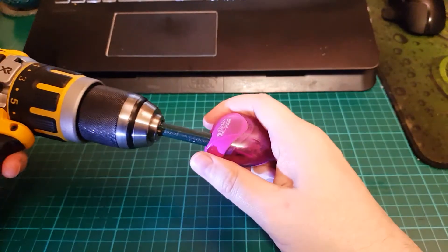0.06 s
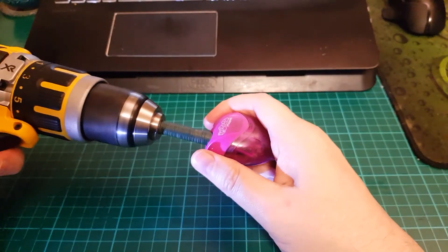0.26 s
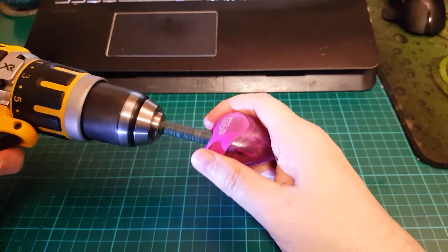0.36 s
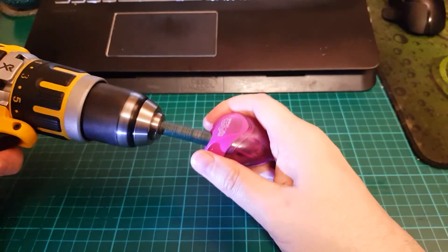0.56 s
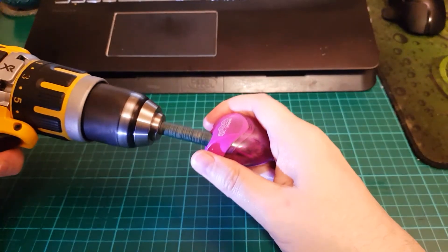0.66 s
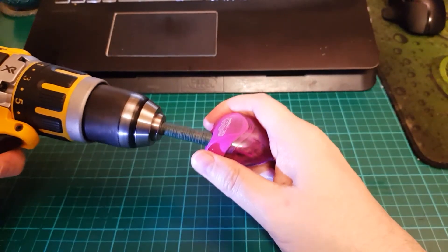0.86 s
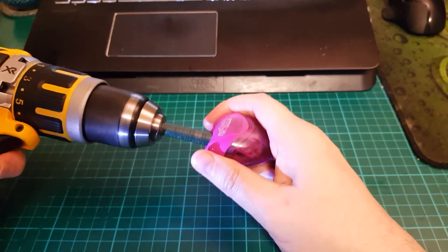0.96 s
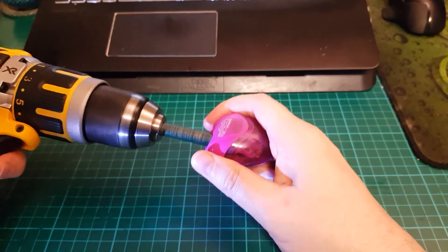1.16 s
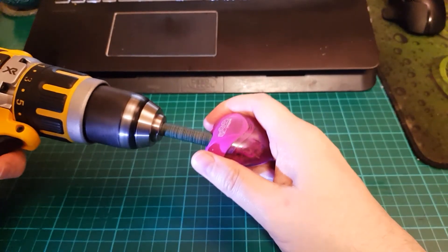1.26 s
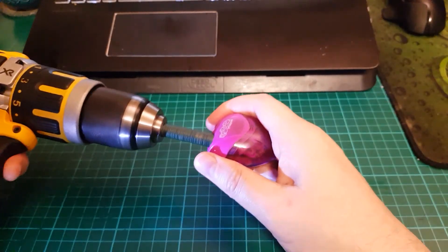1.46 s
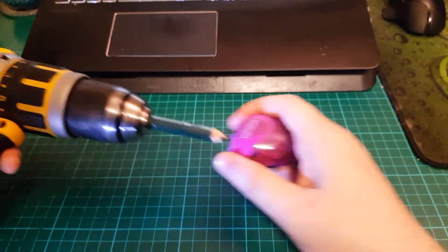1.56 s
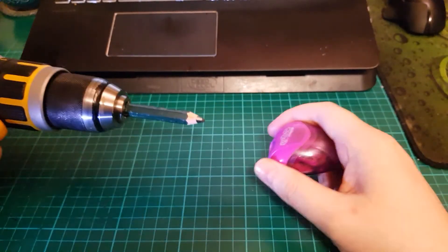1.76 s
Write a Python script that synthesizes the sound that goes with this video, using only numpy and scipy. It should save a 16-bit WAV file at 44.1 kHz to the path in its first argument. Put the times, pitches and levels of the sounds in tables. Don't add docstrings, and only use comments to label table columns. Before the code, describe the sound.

A cordless drill, close up in a quiet small room. Faint hum and hiss, then trigger creaks and clicks at 0.12-0.24 seconds. The motor leaps to speed by about 0.35 and holds a nearly steady high whine within a dense, bright, fluttering rush of fan and sharpener blade. At 1.47 it brakes, pitch falling fast, with a tick near 1.54, soft desk thumps and a faint pencil slide until 1.76.

```python
import sys
import numpy as np
from scipy import signal
from scipy.io import wavfile
from scipy.ndimage import uniform_filter1d

SR = 44100
rng = np.random.default_rng(int(sys.argv[2]) if len(sys.argv) > 2 else 0)


def field_ratio(decibels):
    return 10 ** (np.asarray(decibels, dtype=float) / 20)


def unload_wav(signal):
    wavfile.write(
        sys.argv[1],
        SR,
        np.round(np.clip(np.atleast_2d(signal).T, -1, 1) * 32767).astype(np.int16),
    )


N = 79380
FULL_HZ = 6308
BRAKE_S = 1.472


def evened(x):
    return x / np.sqrt(np.mean(x ** 2) + 1e-20)


def read(points, hz):
    f, value = np.transpose(points)
    return np.interp(np.log(hz + 1), np.log(f + 1), value)


def follow(points, t):
    return np.interp(t, *np.transpose(points))


def drift(rate_hz):
    t = np.arange(0, N + 64, 64)[:, None] / SR
    f = np.geomspace(rate_hz / 8, rate_hz, 12) * rng.uniform(.9, 1.1, 12)
    wander = evened(np.sin(2 * np.pi * (f * t + rng.random(12))).sum(1))
    return np.interp(np.arange(N), np.arange(len(t)) * 64, wander)


# frequency in Hz, level in dB.
RUSH_COLOUR = [(40, -12), (200, -20), (500, -9.5), (700, -12.5), (1100, -3.5), (5000, -1.5), (9000, -1.5),
               (16000, -2)]
# frequency in Hz, width in Hz, level in dB.
LEFT_PORT = [(1686, 800, 1.5), (2400, 290, 6.5), (2994, 106, 7.5), (3750, 1230, 2.5), (6500, 1000, 3.5),
             (7260, 880, 6), (12650, 1760, 8), (12280, 1600, 5), (15300, 810, -7.5)]
# frequency in Hz, width in Hz, level in dB.
RIGHT_PORT = [(1710, 500, -9), (2220, 930, -0.5), (3480, 2300, 1.5), (4400, 640, -2.5), (6200, 1200, -18),
              (7100, 300, -7), (8640, 180, 12.5), (12000, 1500, -13), (15300, 700, -15)]
# frequency in Hz, width in Hz, depth in dB.
DESK_DIPS = [(2150, 180, -8.5), (2870, 110, 0), (4880, 170, -9), (8680, 320, -11)]


def colour(hz):
    def bump(f, width):
        return 1 / (1 + (2 * (hz - f) / width) ** 2)

    dips = field_ratio(sum(db * bump(f, width) for f, width, db in DESK_DIPS))
    gains = []
    for port in (LEFT_PORT, RIGHT_PORT):
        rings = sum(field_ratio(2 * db) * bump(f, width) ** 2 for f, width, db in port)
        gains.append(dips * np.sqrt(field_ratio(2 * read(RUSH_COLOUR, hz)) + rings))
    return np.array(gains)


# frequency in Hz, likeness from 0 to 1.
LIKENESS = [(60, 0.87), (400, 0.97), (800, 0.6), (1700, .35), (2500, 0.55), (4000, .4), (6000, 0.25),
            (12000, 0.2), (15200, .35)]


def pair(gains, drive, patchy_db):
    left_lag_s = -0.00016
    hz, _, z = signal.stft(drive, SR, nperseg=512, noverlap=384)
    patches = uniform_filter1d(rng.standard_normal(z.shape[1:]), 6, 0)
    patches = evened(uniform_filter1d(patches, 20, 1))
    same = np.clip(read(LIKENESS, hz), 0, 1)[:, None]
    left = z[0] * np.exp(-2j * np.pi * hz * left_lag_s)[:, None]
    right = same * z[0] + np.sqrt(1 - same ** 2) * z[1]
    z = np.array([left, right]) * gains(hz)[..., None] * field_ratio(patchy_db * patches)
    return evened(signal.istft(z, SR, nperseg=512, noverlap=384)[1][:, :N])


# frequency in Hz, level in dB per Hz.
HUSH_COLOUR = [(18, -25), (30, -3), (311, -7.5), (780, -25), (3220, -30.5), (7270, -33), (8520, -38.5),
               (12600, -31.5), (16000, -28)]


def hush():
    def gains(hz):
        return field_ratio(read(HUSH_COLOUR, hz))[None] * np.ones((2, 1))

    return field_ratio(-65.5 + 1.4 * drift(14)) * pair(gains, rng.standard_normal((2, N)), patchy_db=2.5)


def room(x):
    t60_s, first_s, density = 0.2, .004, .05
    t = np.arange(SR // 2) / SR
    taps = rng.choice([-1., 1.], (2, len(t))) * (rng.random((2, len(t))) < density)
    taps *= field_ratio(-60 * t / t60_s) * (t > first_s)
    return signal.fftconvolve(x, taps / np.linalg.norm(taps[0]), axes=1)[:, :N]


# start in seconds, level in dB, frequency in Hz, 60 dB decay in seconds.
DESK_BUMPS = [(0.119, -52, 120, 0.27), (0.183, -42.5, 124, 0.31), (0.198, -55, 263, 0.089),
              (1.491, -34.5, 132, 0.22), (1.553, -30, 127, 0.05), (1.6, -45, 125, .15),
              (1.565, -51, 45, 0.21), (1.6, -55, 293, 0.18), (1.639, -43.5, 128, 0.15),
              (1.705, -39.5, 108, 0.068), (1.71, -49, 50.4, 0.14)]


def desk_bumps(t):
    out = np.zeros(N)
    for start, db, hz, t60 in DESK_BUMPS:
        u = np.maximum(t - start, 0)
        out += field_ratio(db - 60 * u / t60) * np.minimum(u / 0.012, 1) * np.sin(2 * np.pi * hz * u)
    return out


# start in seconds, length in seconds, level in dB, change over the stroke in dB.
RUB_STROKES = [
    (0.119, 0.13, -47, 0),
    (0.199, 0.033, -63, 39),
    (1.54, 0.22, -50, -10.5),
]
# start in seconds, level in dB, ring frequency in Hz.
PLASTIC_TICKS = [(0.144, -58, 5450), (.151, -51, 7100), (0.173, -38, 4500), (0.177, -35.5, 1500),
                 (0.196, -51, 1510), (0.213, -42.5, 3480), (0.224, -43, 1790), (0.241, -25, 2400),
                 (1.535, -35, 9200), (1.537, -23, 1560), (1.652, -63, 1150), (1.706, -59, 1200)]
# frequency in Hz, level in dB.
TRIGGER_COLOUR = [(60, 4.5), (300, 11), (800, 11), (1600, 5.5), (6000, -4), (9500, -9.5), (13000, -7.5),
                  (16000, 6)]
# frequency in Hz, level in dB.
PENCIL_COLOUR = [(100, 24), (400, 15.5), (1500, -6), (5000, -4), (9500, 1), (16000, 6)]


def handling():
    t = np.arange(N) / SR
    drive, ring = np.zeros(N), np.zeros(N)
    for start, length, db, fall_db in RUB_STROKES:
        u = np.clip((t - start) / length, 0, 1)
        drive += field_ratio(db + fall_db * u) * np.minimum(np.minimum(u, 1 - u) / 0.44, 1) ** 1.9
    drive *= field_ratio(0.63 * evened(uniform_filter1d(rng.standard_normal(N), 150)))
    for start, db, hz in PLASTIC_TICKS:
        u = np.maximum(t - start, 0)
        drive += (t > start) * field_ratio(db - 60 * u / 0.0086)
        ring += field_ratio(db - 4 - 60 * u / .012) * np.sin(2 * np.pi * hz * u)
    out = ring + desk_bumps(t)
    for force, tint in ((drive * (t < BRAKE_S), TRIGGER_COLOUR), (drive * (t >= BRAKE_S), PENCIL_COLOUR)):
        noise = pair(lambda hz: colour(hz) * field_ratio(read(tint, hz)), force * rng.standard_normal((2, N)), patchy_db=1)
        out = out + np.std(force) * noise
    return out


# time in seconds, second mesh order in Hz.
BLADE_SAG = [(.38, 12592), (.47, 12621), (.535, 12622), (.58, 12597), (.68, 12598), (.74, 12618),
             (.8, 12584), (.89, 12587), (.97, 12615), (1.04, 12610), (1.085, 12580), (1.16, 12617),
             (1.26, 12618), (1.32, 12611), (1.345, 12597), (1.39, 12615), (1.44, 12623)]


def motor_speed(t):
    start_s, run_up_s, brake_per_s = .244, .0265, 9.2
    run_up = 1 - np.exp(-np.maximum(t - start_s, 0) / run_up_s)
    brake = np.clip(1 - brake_per_s * (t - BRAKE_S), 0, 1)
    return uniform_filter1d(np.minimum(run_up, brake) * follow(BLADE_SAG, t) / (2 * FULL_HZ), size=600)


def blade_rush(turns, speed, braking):
    carrier, rotor, spindle = 96.9 / FULL_HZ, 393 / FULL_HZ, 32.3 / FULL_HZ
    pulses = [(carrier, .11), (2 * carrier, .07), (3 * carrier, -.08), (rotor, .08), (spindle, .05)]
    beat = 1 + sum(depth * np.cos(2 * np.pi * turns * order) for order, depth in pulses)
    grit = field_ratio(0.21 * evened(uniform_filter1d(rng.standard_normal(N), 40)) + 0.35 * drift(8.6))
    rush = field_ratio(-20.5) * pair(colour, rng.standard_normal((2, N)) * beat * grit, patchy_db=1.68)
    dull = uniform_filter1d(rush, size=4, axis=1)
    return dull + (rush - dull) * field_ratio((1 - speed) * np.where(braking, -9, -4))


def whine(lines, turns, gain_db, waver_db, waver_hz, pan_db, lag_turns):
    out = np.zeros((2, N))
    for hz, db in lines:
        phase = 2 * np.pi * (turns * hz / FULL_HZ + rng.random() + 0.01 * drift(waver_hz))
        for ear in (0, 1):
            level = field_ratio(db + gain_db + waver_db * drift(waver_hz))
            out[ear] += level * np.cos(phase + 2 * np.pi * lag_turns * ear)
    return out * field_ratio([[pan_db / 2], [-pan_db / 2]])


# frequency in Hz, level in dB.
SHAFT_LINES = [(295.5, -60), (360.7, -53), (392.8, -44), (424.9, -53), (785.6, -55)]
# frequency in Hz, level in dB.
RATTLE_LINES = [(457.2, -58), (489.7, -55), (520.5, -57), (589.3, -57), (882, -61), (1571, -52),
                (2363, -53), (2470, -54), (3400, -53), (3741, -52), (4037, -49)]
# frequency in Hz, level in dB.
CHUCK_LINES = [(32.3, -64), (64.6, -59), (96.9, -53), (128, -56)]
# time in seconds, level in dB.
HAND_PRESS = [(.3, -19), (.36, 3), (.52, -4), (.6, -5.5), (.76, -8), (.81, 3), (1.05, 0.5), (1.35, -0.5),
              (1.42, -8)]


def shaft_hum(t, turns, speed, braking):
    shaft = whine(SHAFT_LINES, turns, 1.8, 0.41, 8.2, -3.0, 0.01) * speed ** np.where(braking, 2.5, 1)
    rattle = whine(RATTLE_LINES, turns, 3.1, 6.0, 14, 0.1, 0.079) * speed ** 10
    chuck = whine(CHUCK_LINES, turns, 1.6, 3.9, 11, -.6, 0) * speed ** 2
    return shaft + rattle + chuck * field_ratio(follow(HAND_PRESS, t))


# frequency in Hz, level in dB.
POLE_LINES = [(3142.5, -33)]
# time in seconds, level in dB.
CASING_PULL = [(.35, 0), (.52, 0.5), (.8, -1), (1.08, -2.5), (1.3, -2), (1.44, 0)]


def pole_whine(t, turns, speed, braking):
    casing = 1 / (1 + ((1 - speed) / np.where(braking, .045, .075)) ** 4)
    return casing * field_ratio(follow(CASING_PULL, t)) * whine(POLE_LINES, turns, 4.8, .6, 40, -13, -.34)


# frequency in Hz, level in dB.
PLANET_LINES = [(5524, -50), (5721, -47), (5820, -48), (5912, -48), (6011, -46), (6206, -45), (6402, -46),
                (6497, -42), (6596, -48), (6696, -47), (6796, -48), (7280, -47), (7385, -46), (8248, -50)]
# frequency in Hz, level in dB.
PLANET_TWICE_LINES = [(11740, -52), (11838, -48), (11932, -47), (12026, -44), (12124, -43), (12220, -44),
                      (12410, -43), (12512, -39), (12812, -43), (12907, -45), (13089, -47)]
# frequency in Hz, level in dB.
TOOTH_LINES = [(6308, -40)]
# frequency in Hz, level in dB.
TOOTH_TWICE_LINES = [(12616, -33)]


def gear_whine(turns, speed, braking):
    port = 1 / (1 + ((1 - speed) / .035) ** 2)
    planets = speed ** 8 * whine(PLANET_LINES, turns, 7.5, 3.3, 25.2, 4.3, 0.28)
    planets += port * whine(PLANET_TWICE_LINES, turns, 3.3, 1.8, 25, 15.6, 0.25)
    strain_db = 6.5 * np.where(braking, .6, 1) + 2 * drift(90)
    strain = field_ratio(strain_db * np.minimum(4 * (1 - speed), 1))
    strain *= np.minimum(np.where(braking, 1.65, 2) * speed, 1) ** np.where(braking, 6, 2)
    teeth = strain * whine(TOOTH_LINES, turns, 4.5, 1.8, 30, 8, .3)
    teeth += port * whine(TOOTH_TWICE_LINES, turns, 2.8, 1.6, 35, 17, -.3)
    return planets + teeth


# time in seconds, level in dB.
DRILL_EFFORT = [(.205, -69), (.22, -46), (.241, -23.5), (.286, -19.5), (.36, -21), (.8, -21.5), (1.45, -22),
                (1.498, -21.5), (1.54, -23), (1.556, -35), (1.575, -47)]


def drill():
    t = np.arange(N) / SR
    braking = t > BRAKE_S
    speed = motor_speed(t)
    turns = np.cumsum(speed * FULL_HZ) / SR
    level = field_ratio(np.interp(t, *np.transpose(DRILL_EFFORT), left=-99, right=-99) + 22.5)
    lines = shaft_hum(t, turns, speed, braking) + pole_whine(t, turns, speed, braking)
    lines += gear_whine(turns, speed, braking)
    return level * (blade_rush(turns, speed, braking) + lines)


def scene():
    near = drill() + handling()
    return near + field_ratio(-16) * room(near) + hush()


def band_limit(x):
    return signal.sosfilt(signal.butter(12, 16790, fs=SR, output="sos"), x)


def record(dry):
    edge = signal.firwin(1023, 15720, window=("kaiser", 9), fs=SR)[None]
    mix = signal.oaconvolve(dry, edge, "same")
    return band_limit(mix)


dry = scene()
out = record(dry)
unload_wav(out)
```